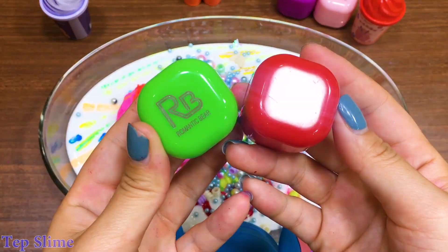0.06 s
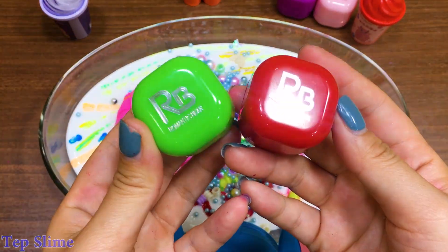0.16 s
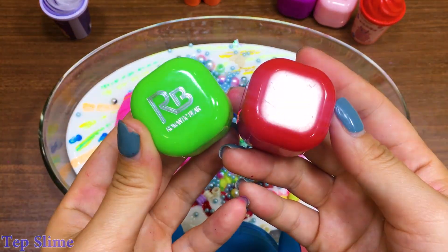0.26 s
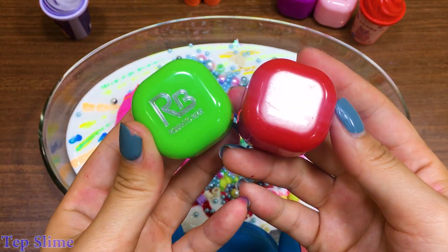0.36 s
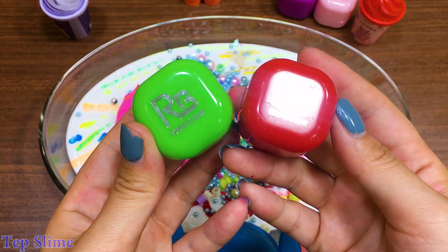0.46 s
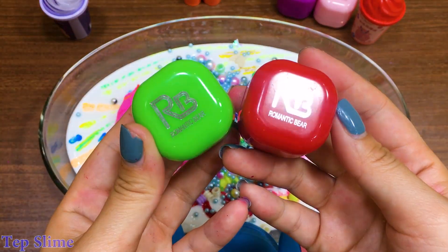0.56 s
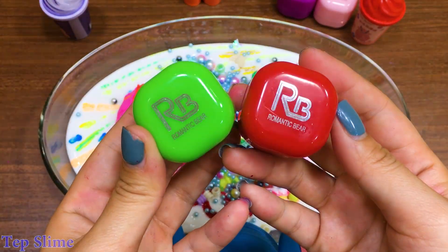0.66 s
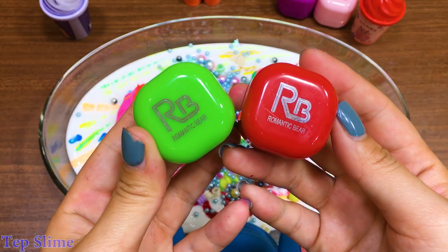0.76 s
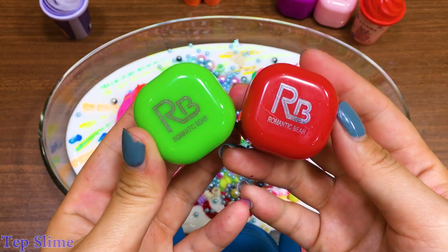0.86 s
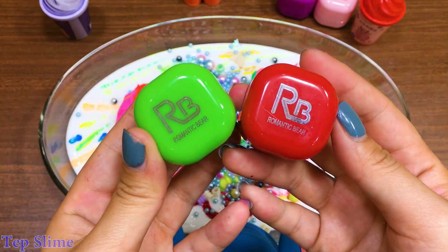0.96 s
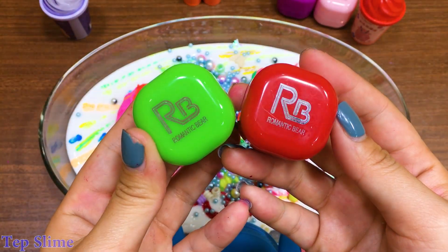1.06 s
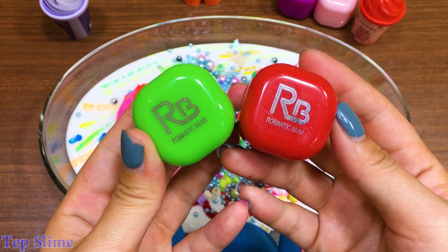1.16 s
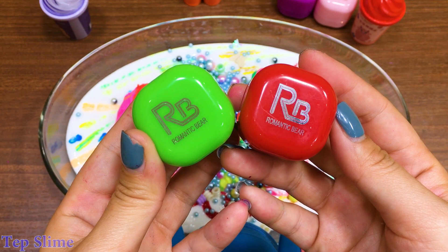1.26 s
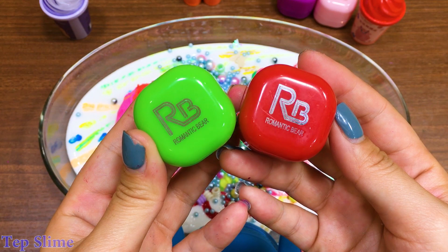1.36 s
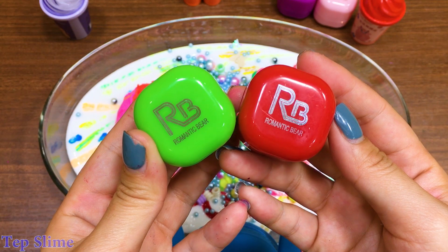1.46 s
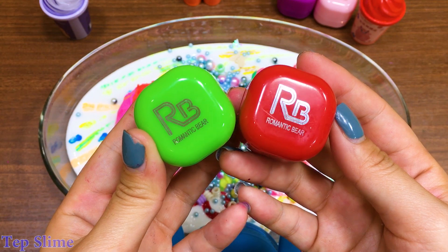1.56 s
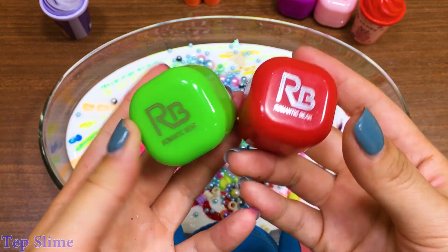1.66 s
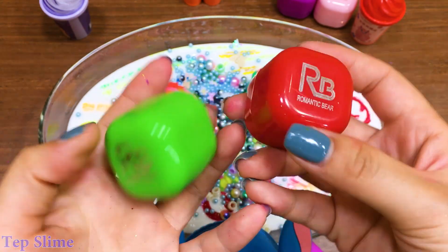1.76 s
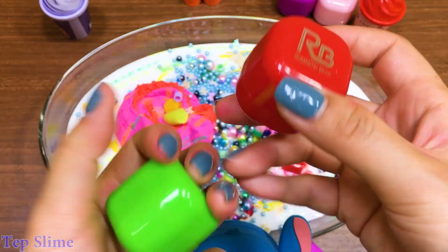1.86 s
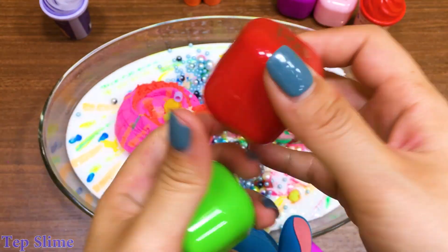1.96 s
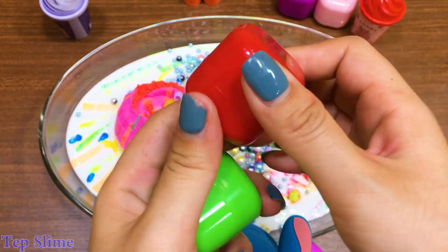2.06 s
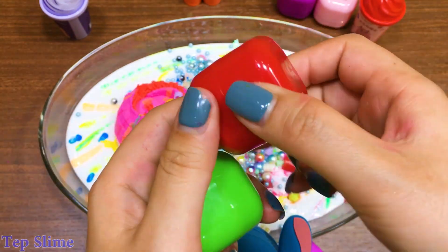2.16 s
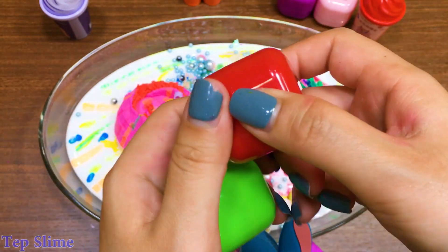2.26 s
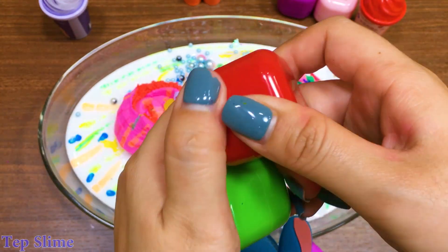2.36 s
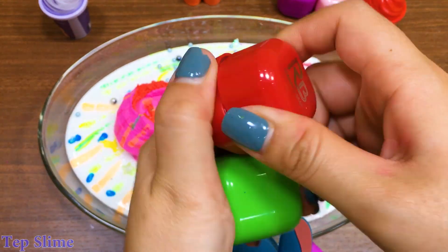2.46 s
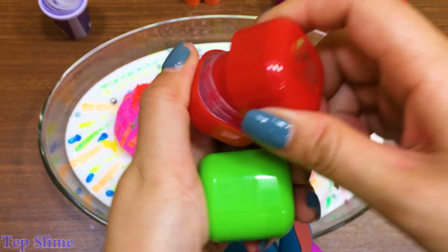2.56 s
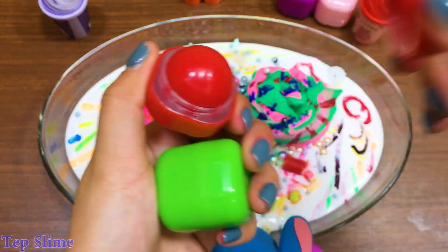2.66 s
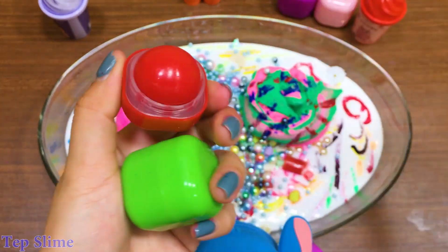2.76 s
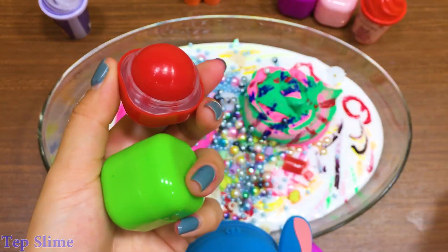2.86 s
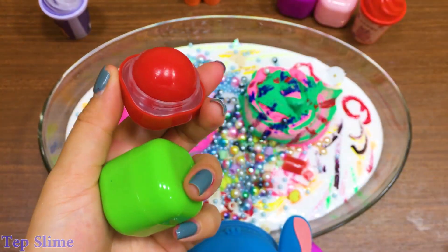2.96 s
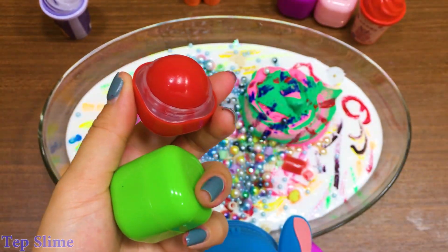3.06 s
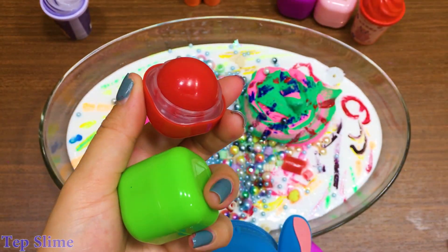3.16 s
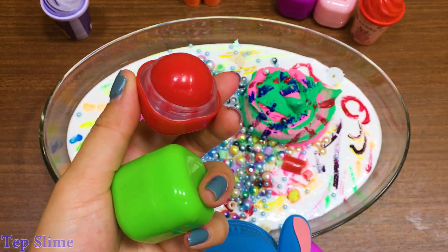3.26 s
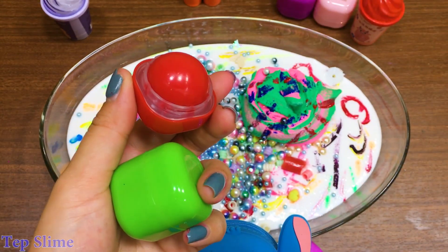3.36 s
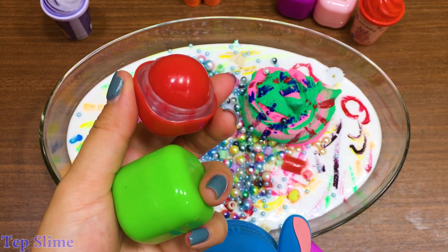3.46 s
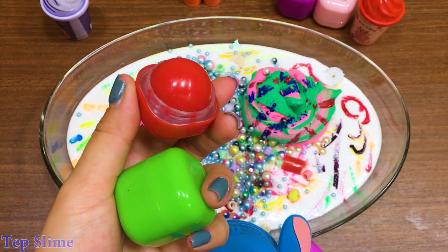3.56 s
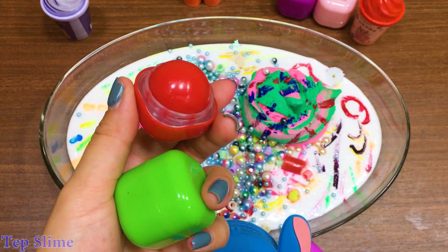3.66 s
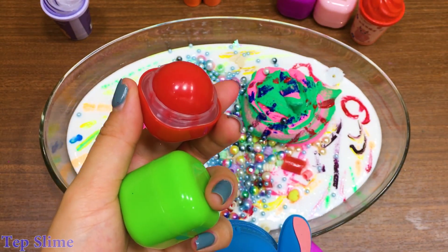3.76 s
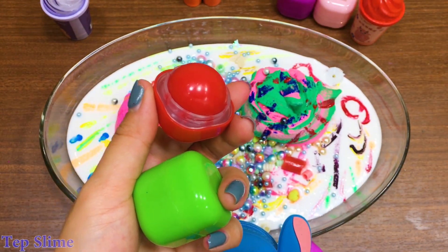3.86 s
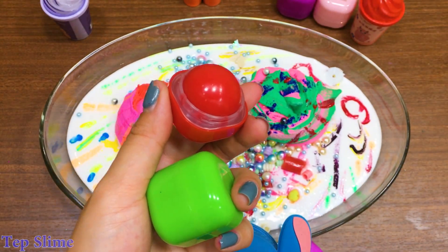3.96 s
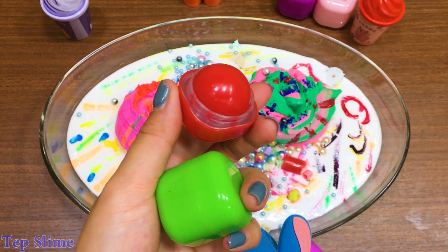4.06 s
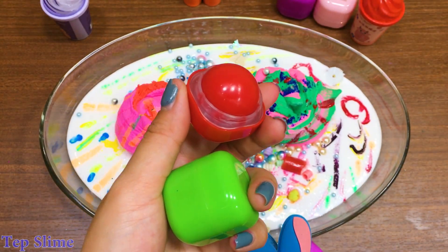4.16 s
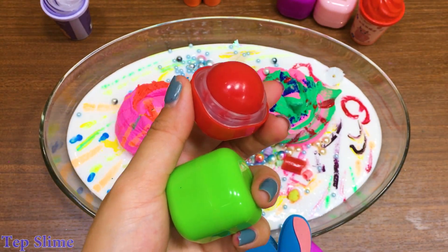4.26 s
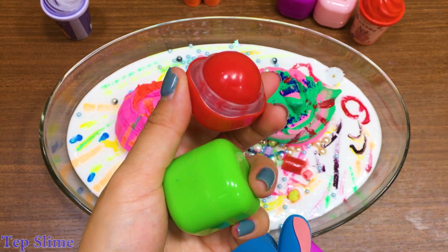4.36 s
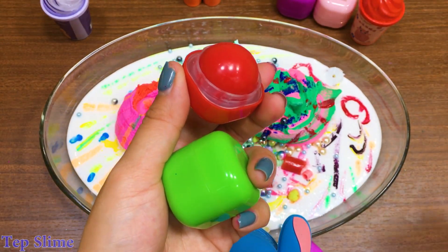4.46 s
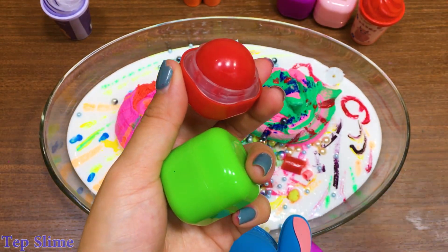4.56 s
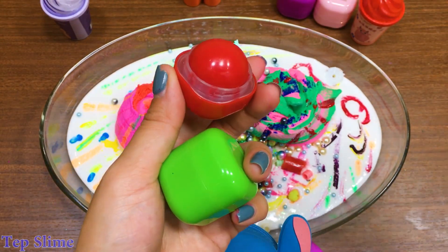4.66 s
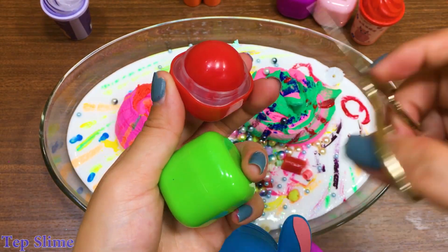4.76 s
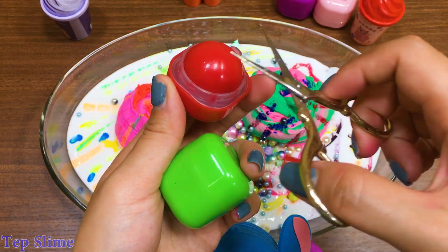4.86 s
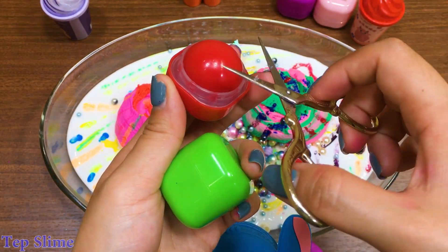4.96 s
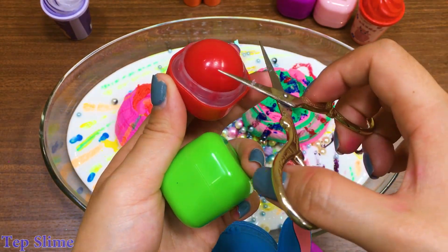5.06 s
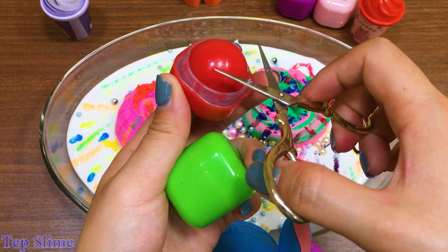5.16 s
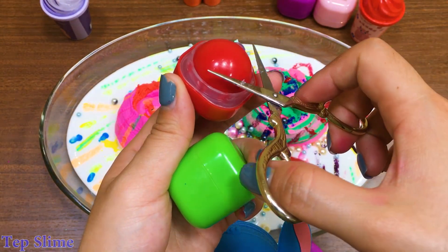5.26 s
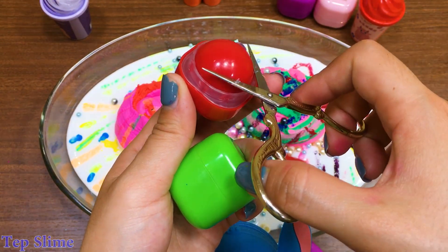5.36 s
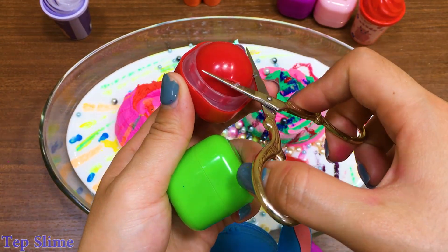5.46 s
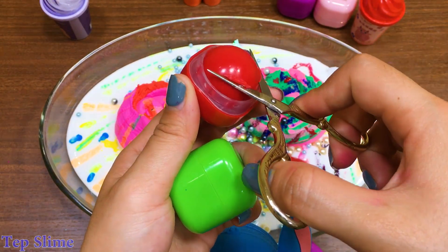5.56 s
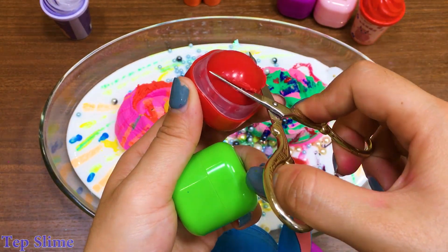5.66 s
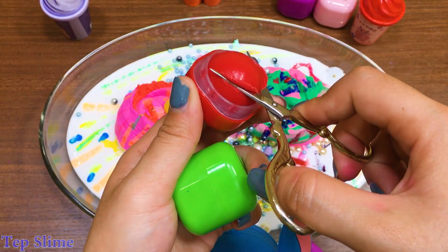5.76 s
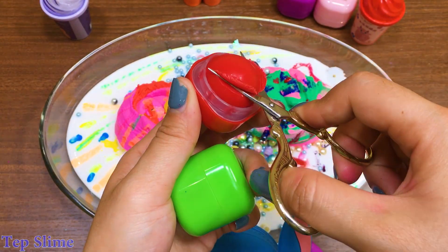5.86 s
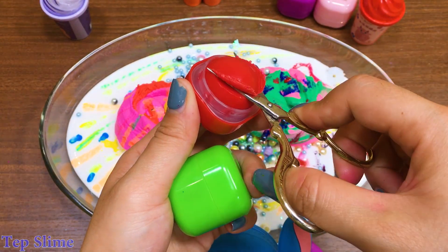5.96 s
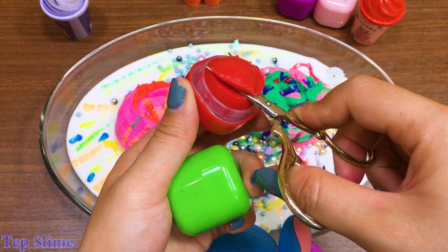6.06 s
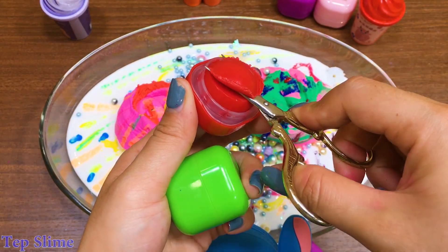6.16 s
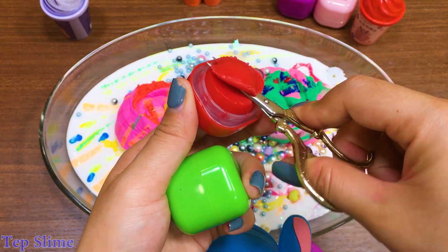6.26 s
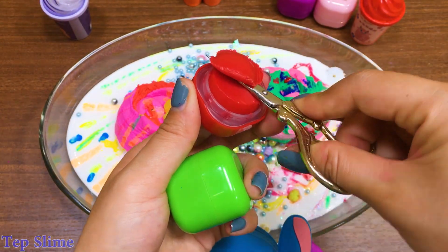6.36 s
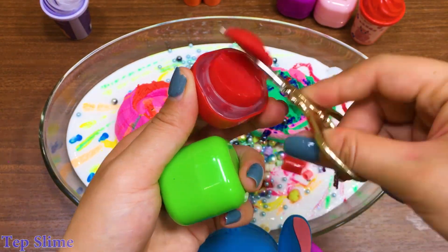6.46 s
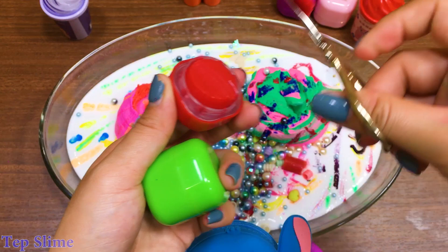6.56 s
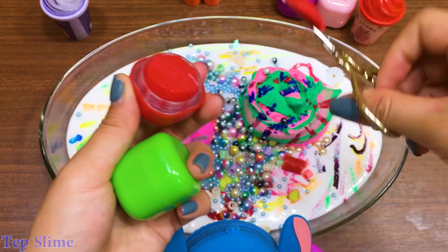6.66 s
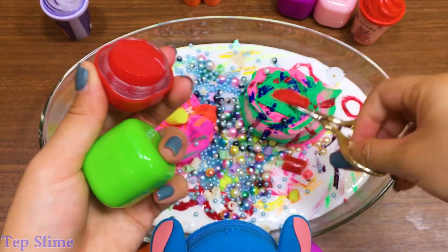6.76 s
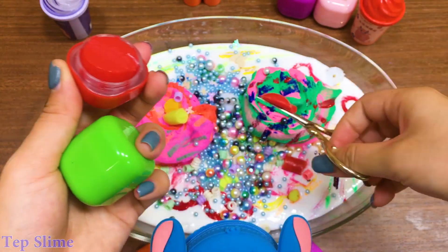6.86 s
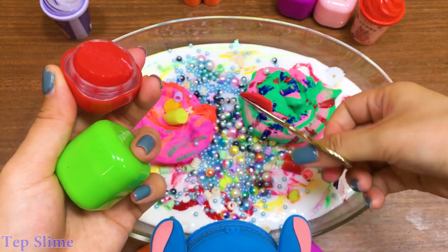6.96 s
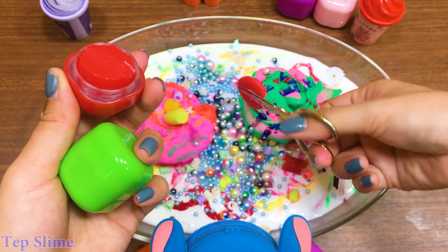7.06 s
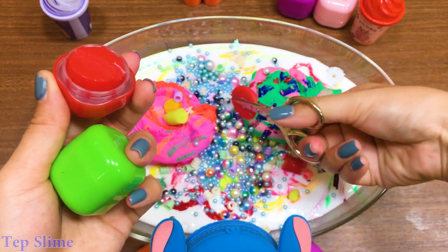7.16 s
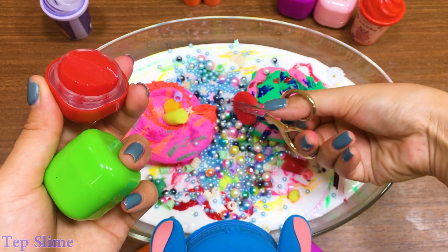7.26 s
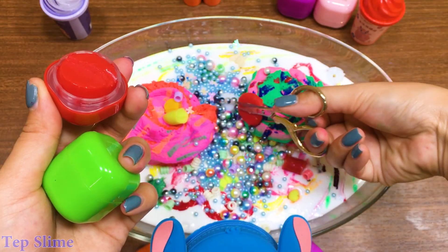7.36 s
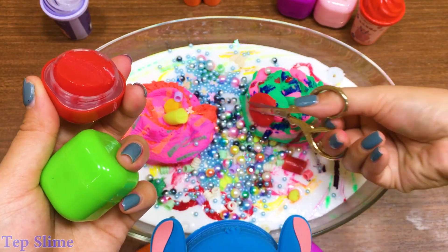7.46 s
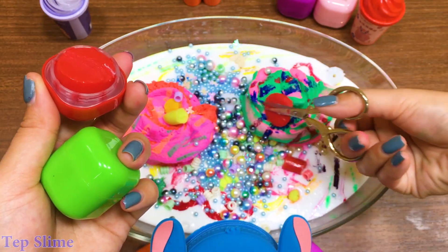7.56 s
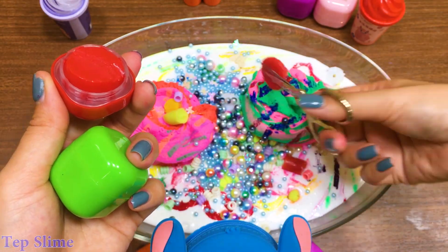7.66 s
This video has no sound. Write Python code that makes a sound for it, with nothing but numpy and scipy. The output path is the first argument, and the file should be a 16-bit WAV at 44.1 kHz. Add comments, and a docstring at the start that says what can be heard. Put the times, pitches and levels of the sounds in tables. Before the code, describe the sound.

Close plastic clicks and a sharp snap, a lid set down on wood, then steel scissors scraping, clinking and ticking in a quiet room.

```python
"""A quiet room, close to the microphone, with a low rumble and a faint hiss throughout.
Fingers rub a small plastic lip balm case; its lid clicks, creaks over the catch and snaps free.
The lid is set down on a wooden table, where it rocks on its rim and sets the top ringing.
Small steel scissors scrape across the wood and clink as they lift off; last, held by the
microphone, their blades tick together and knock at the pivot."""
import sys
import numpy as np
from scipy import signal
from scipy.fft import rfft, irfft, next_fast_len
from scipy.io import wavfile
from scipy.ndimage import map_coordinates

SR = 44100
rng = np.random.default_rng(int(sys.argv[2]) if len(sys.argv) > 2 else 0)


def wrap_up_sound(samples):
    """Save the sound to the file named by the first command line argument, as 16-bit audio."""
    columns = np.atleast_2d(samples).T
    # keep every value between -1 and 1, then stretch to whole-number steps
    tamed = np.clip(columns, -1, 1)
    steps = np.round(tamed * 32767).astype(np.int16)
    wavfile.write(sys.argv[1], SR, steps)


N = 339525

# Spectra of the room's rumble and the microphone's hiss: (frequency [Hz], relative level [dB])
RUMBLE_SPECTRUM = [(15, -46), (25, -19), (38, -7.5), (60, -1), (81, -3.5), (114, -3.5), (140, -7.5),
                   (220, -5.5), (297, -10.5), (330, -9), (372, -13.5), (445, -12), (565, -19), (730, -24),
                   (900, -27.5), (1170, -56), (1980, -120)]
HISS_SPECTRUM = [(410, -30.5), (700, -2.5), (863, -9), (971, -4.5), (1680, -8.5), (2370, -8), (2920, -10.5),
                 (4490, -9), (5400, -13.5), (6150, -10), (9730, -12), (11500, -15.5), (12600, -13),
                 (15000, -15.5), (16000, -20.5)]

# The snap's brief dying tail in the room, then the lid scraping off the case:
# (start [s], time to release [s], level at release [dB], release t60 [s])
SNAP_TAIL_AND_SCRAPE = [(2.740, .002, -50.5, .25), (2.818, .019, -45, 0.035)]

# Sliding strokes: (start [s], push [s], peak level [dB], release t60 [s])
FINGER_RUBS = [(2.03, 0.062, -64.5, 0.17), (2.14, .015, -66, .2), (2.19, 0.043, -64, .12),
               (2.4, 0.3, -68, 1.2)]  # skin on plastic
SCISSOR_DRAGS = [(3.856, 0.036, -55, 0.13), (4.166, 0.036, -44, 0.33), (4.228, 0.035, -41.5, 0.086),
                 (4.345, .012, -57.5, 0.071)]  # steel on wood
LIFT_SCUFFS = [(4.262, 0.029, -46.5, 0.22), (4.338, 0.023, -50, 0.13)]  # hollow scuffs as the scissors leave the table
STEEL_SQUEAKS = [(4.394, 0.031, -63.5, .05)]
BLADE_SHEARS = [(6.542, 0.038, -63, .25)]  # blade over blade at the pivot

# Contacts: (time [s], level [dB], tilt above 1 kHz [dB/octave], chatter t60 [s])
CASE_CLICKS = [(2.343, -47, 9.5, .003), (2.395, -52.5, -1, 0.0038), (2.5316, -23.5, -2.5, 0.012),
               (2.617, -43.5, 6, 0.0023), (2.6206, -40, -2, 0.0052), (2.7357, -10, 1.5, .005),
               (2.8044, -50, 7, .006), (2.8187, -35, -1, 0.019)]  # lid against case
EDGE_TICKS = [(3.0291, -49, -1, 0.0021), (3.2994, -45, 13, .008)]  # nail and rim on plastic
LID_KNOCKS = [(3.2996, -31, -10, 0.004), (3.3027, -22, 0, 0.013), (3.3140, -32, -4.5, 0.012)]  # lid landing flat on the table
LID_ROCKS = [(3.4050, -40.5, -5.5, 0.029), (3.4260, -40, 0.5, 0.025), (3.4392, -39, -2, 0.011)]  # lid rocking on its rim
SCISSOR_CATCHES = [(3.8815, -45.5, -3.5, .006), (3.8945, -48.5, -4, .005), (4.1675, -45, -1, 0.0062),
                   (4.2275, -38.5, 5, 0.0068), (4.2343, -34.5, -5, 0.0044), (4.2570, -34, -7.5, 0.0067)]  # steel catching on wood
HANDLE_CLINKS = [(4.2623, -25.5, -2, 0.021), (4.2638, -27.5, -5.5, 0.013)]
# Blades touching: (time [s], level [dB], tilt above 1 kHz [dB/octave], chatter t60 [s], pivot knock [dB])
BLADE_TICKS = [(4.8878, -54, -2, 0.0066, -69.5), (4.9370, -36.5, -0.5, 0.0098, -49.5),
               (6.5792, -66, -3, .004, -51), (6.5860, -60, 0, .004, -51), (6.6147, -33, -2, 0.0097, -38.5),
               (7.6522, -52.5, -4.5, .009, -75), (7.6690, -51, -0.5, .014, -71.5)]

# Spectra of the sounds, heard close up: (frequency [Hz], relative level [dB])
SKIN_SPECTRUM = [(800, -15.5), (2000, -2.5), (4000, 0.5), (6000, -4), (9000, -1.5), (11500, -7),
                 (14500, -3.5), (16000, -6.5)]
CASE_SPECTRUM = [(100, -25.5), (200, -14), (450, -17), (620, -24.5), (760, -8.5), (1100, -2.5), (1400, -6),
                 (2000, 1.5), (3900, -3.5), (4900, 0.5), (5900, -24), (8600, -11.5), (12300, -23),
                 (14500, -22)]
TAIL_AND_SCRAPE_SPECTRUM = [(59, -31.5), (100, -1.5), (206, 1.5), (1760, -14), (1910, -8), (3320, -8.5),
                            (3780, -13), (4290, -4.5), (5300, -12), (8640, -7), (10200, -17.5),
                            (14700, -15), (16000, -21)]
EDGE_SPECTRUM = [(500, -22), (2500, -17), (4200, -12), (5500, -14.5), (7500, 10), (9000, -8), (11500, -15),
                 (14000, -9), (16000, -12.5)]
LID_SPECTRUM = [(100, -35.5), (420, -6), (780, -9.5), (1200, -3), (1900, -1.5), (3300, -6.5), (3900, -5.5),
                (5300, -6), (6200, -36), (8000, -21), (8900, -14.5), (10500, -27), (16000, -33)]
SCRAPE_SPECTRUM = [(100, -19), (400, -10), (750, -7), (1000, -9), (1350, -6), (1650, -7), (2200, -1),
                   (2900, -3), (4200, -3), (5500, -12), (8000, -25), (16000, -37)]
SCUFF_SPECTRUM = [(200, -18), (850, -11), (1050, -2), (1230, -1.5), (1450, -6), (1680, -9), (2300, -22),
                  (3000, -25), (5500, -28), (8000, -35), (16000, -44)]
HANDLE_SPECTRUM = [(500, -24), (2000, -39), (5000, -13), (8500, -14), (10100, -2), (11200, -8), (13000, 4),
                   (16000, -21)]
SQUEAK_SPECTRUM = [(2000, -17), (4700, -8), (5300, -7), (5900, -21), (9300, -21), (9950, -3), (10600, -20),
                   (16000, -21)]
BLADE_SPECTRUM = [(300, -24), (1000, -22.5), (2400, -15.5), (3200, -6), (3950, -13), (4700, -3),
                  (5800, 0.5), (8500, -9.5), (10500, 4), (11600, 3), (13000, -2.5), (16000, -12)]
PIVOT_SPECTRUM = [(1000, -32), (3200, -20.5), (3600, -4), (4000, 2), (4250, -8), (4600, -20), (9000, -32),
                  (16000, -30)]

# Ringing modes of each object: (frequency [Hz], relative level [dB], t60 [s])
CASE_MODES = [(202, -22.5, 0.082), (438, -22, 0.031), (1057, -11.5, .014), (2030, -9.5, 0.0043),
              (2536, -3.5, 0.012), (2994, 1.5, 0.014), (3710, -5, 0.018), (4100, -7, 0.0061),
              (4381, 2.5, 0.0076), (4910, 4.5, 0.0088), (7100, -14, 0.013), (8600, -7.5, 0.012)]
LID_MODES = [(462, 0.5, 0.03), (1092, 11, 0.023), (1230, 5, 0.034), (1380, -9, 0.014), (1740, -3, 0.024),
             (4100, -11, .02), (8900, -13, .03)]
LID_RIM_MODES = [(1080, 7, 0.012), (3680, 0, 0.03), (4780, -1, 0.038), (8740, -18, .05)]
SCRAPE_MODES = [(1090, -4, .04), (1370, -4, 0.048), (2077, -6.5, 0.051), (2364, -6.5, 0.027),
                (3480, -4.5, .02), (4130, -9, 0.025)]  # scissors and wood together
HANDLE_MODES = [(7500, -3.5, 0.018), (10200, -7, 0.014), (12760, -1, 0.017), (12880, 0, 0.052),
                (13230, -5, 0.046), (14420, -8, .02), (15020, -6, .02)]
BLADE_MODES = [(3990, -6, 0.016), (7100, 1, 0.01), (8430, -11, 0.022), (10700, -17, .009),
               (12800, 9.5, 0.0089), (15000, 2, 0.016)]

# Response of the wooden top: (frequency [Hz], gain [dB])
TABLE_RESPONSE = [(100, -9), (400, -4), (800, -4), (1200, 0), (1600, -3), (2700, 0), (3100, -13),
                  (4200, -12), (7000, -28), (16000, -30)]
# Decay of the table top and of the room: (frequency [Hz], t60 [s])
TABLE_T60 = [(200, 0.72), (1200, 0.21), (3000, .16), (10000, 0.089)]
ROOM_T60 = [(200, .3), (2000, .24), (8000, .21), (15000, .16)]

# Narrow band of the room's hum: (frequency [Hz], relative level [dB])
HUM_SPECTRUM = [(40, -57.5), (51, -8), (56, -0.5), (61, -14.0), (80, -50), (300, -100)]


def amp(db):
    """Decibels to gain."""
    return 10 ** (np.asarray(db) / 20)


def unit_rms(x):
    """Scale to rms 1."""
    return x / np.sqrt(np.mean(x ** 2) + 1e-20)


def unit_energy(x):
    """Scale to a sum of squares of 1."""
    return x / (np.linalg.norm(x) + 1e-12)


def along(points, hz):
    """Read (frequency [Hz], value) points on a log frequency axis."""
    frequencies, values = np.transpose(points)
    return np.interp(np.log(hz + 1), np.log(frequencies + 1), values)


def colour(x, gain_db):
    """Causal (minimum-phase) filter whose gain is a function of frequency."""
    size = 2 * next_fast_len(len(x))
    gain = amp(gain_db(np.fft.rfftfreq(size, 1 / SR)))
    cepstrum = irfft(np.log(gain + 1e-6), size)
    cepstrum[1:size // 2] *= 2
    cepstrum[size // 2 + 1:] = 0
    return irfft(rfft(x, size) * np.exp(rfft(cepstrum)), size)[:len(x)]


def shaped(x, spectrum):
    """x coloured by a spectrum, at rms 1."""
    return unit_rms(colour(x, lambda hz: along(spectrum, hz)))


def reverberate(x, t60s):
    """Convolve with a dense tail in which each frequency dies at its own speed."""
    hz, t, noise = signal.stft(rng.standard_normal(SR // 2), SR, nperseg=256)
    decay = amp(-60 * t / along(t60s, hz)[:, None])
    tail = signal.istft(noise * decay, SR, nperseg=256)[1]
    return signal.fftconvolve(x, unit_energy(tail))[:N]


def room_tone(drift_db=1.16, knots_per_s=4):
    """The room's slowly drifting rumble and wavering hum, with the microphone's own hiss."""
    drift = map_coordinates(rng.standard_normal(N // 100), [np.arange(N) * knots_per_s / SR])
    rumble = amp(-65 + drift_db * drift) * shaped(rng.standard_normal(N), RUMBLE_SPECTRUM)
    hum = amp(-81) * shaped(rng.standard_normal(N), HUM_SPECTRUM)
    hiss = amp(-71.5) * shaped(rng.standard_normal(N), HISS_SPECTRUM)
    return rumble + hum + hiss


def strokes(rows, swell_db, grip_s=.004):
    """Gain over time: each stroke sets in, changes by swell_db over its push, then dies away."""
    t, power = np.arange(N) / SR, np.zeros(N)
    for start, push_s, db, t60 in rows:
        grip = np.clip((t - start) / grip_s + 1, 0, 1)
        pushed = np.clip((t - start) / push_s, 0, 1)
        release = np.exp(-np.log(1000) * np.maximum(t - start - push_s, 0) / t60)
        power += (grip * amp(db + swell_db * (pushed - 1)) * release) ** 2
    return np.sqrt(power)


def friction(spectrum, slips_per_s, smooth_db):
    """Tiny slips of random size over a smooth rub, at rms 1."""
    slips = (rng.random(N) < slips_per_s / SR) * rng.standard_normal(N)
    return shaped(unit_rms(slips) + amp(smooth_db) * rng.standard_normal(N), spectrum)


def finger_rubs():
    """Skin slips faintly on the plastic as the fingers turn the case."""
    return strokes(FINGER_RUBS, swell_db=6.5) * friction(SKIN_SPECTRUM, slips_per_s=700, smooth_db=-3)


def fade(t60):
    """A tenth of a second of exponential decay."""
    return np.exp(-np.log(1000) * np.arange(SR // 10) / SR / max(t60, 1e-4))


def ringing(modes):
    """An object's free ring, of energy 1; the grip shifts each mode's strength and pitch a little."""
    t = np.arange(SR // 10) / SR
    ring = np.zeros(len(t))
    for k, (hz, db, t60) in enumerate(modes):
        strength = (-1) ** k * amp(db + rng.normal(0, 1.5))
        pitch_hz = hz * rng.normal(1, .004)
        ring += strength * fade(t60) * np.sin(2 * np.pi * pitch_hz * t)
    return unit_energy(ring)


def contacts(rows, spectrum, modes, chatter_db, ring_db):
    """Each contact is a sharp push with a brief chatter, and rings the object's modes."""
    out = np.zeros(N + SR)
    for start, db, tilt_db, chatter_s in rows:
        force = amp(chatter_db) * unit_energy(rng.standard_normal(SR // 10) * fade(chatter_s))
        force[0] += 1
        impact = unit_energy(colour(force, lambda hz: along(spectrum, hz)))
        hit = impact + amp(ring_db) * ringing(modes)
        # harder, smaller contacts are brighter
        hit = colour(hit, lambda hz: tilt_db * np.log2(np.maximum(hz, 1000) / 1000))
        # the level is that of the hit's energy packed into one millisecond
        out[round(start * SR):][:len(hit)] += amp(db) * np.sqrt(SR / 1000) * unit_energy(hit)
    return out[:N]


def click_touches(give_s=.002, give_db=-28, rebound_share=.34, rebound_db=-11.5):
    """Contact rows of the case's clicks: the plastic gives, strikes home and rebounds once."""
    touches = []
    for start, db, tilt_db, chatter_s in CASE_CLICKS:
        for delay_s, gain_db in [(-give_s, give_db), (0, 0), (rebound_share * chatter_s, rebound_db)]:
            touches.append((start + delay_s, db + gain_db, tilt_db, chatter_s))
    return touches


def creak_slips(count=7, start_s=2.6715, first_gap_s=.0026, slowing=1.45):
    """Contact rows of a stick-slip creak: the lid sticks longer each time and slips harder, up to a cap."""
    full_db, full_stick_s, db_per_doubling = -42, .007, 8.5
    tilt_db, chatter_s = .5, .003
    gaps = first_gap_s * slowing ** np.arange(count)
    times = start_s + np.cumsum(gaps) - gaps
    load = np.minimum(gaps / slowing / full_stick_s, 1)
    levels = full_db + db_per_doubling * np.log2(load)
    return [(time, db, tilt_db, chatter_s) for time, db in zip(times, levels)]


def case_opening():
    """The lid clicks, creaks, snaps with a brief tail in the room, then scrapes off; hard edges tick."""
    clicks = contacts(click_touches() + creak_slips(), CASE_SPECTRUM, CASE_MODES, chatter_db=-5, ring_db=-4)
    ticks = contacts(EDGE_TICKS, EDGE_SPECTRUM, CASE_MODES, chatter_db=0, ring_db=-16)
    dense_noise = friction(TAIL_AND_SCRAPE_SPECTRUM, slips_per_s=4400, smooth_db=-1)
    tail_and_scrape = strokes(SNAP_TAIL_AND_SCRAPE, swell_db=-3) * dense_noise
    return clicks + ticks + tail_and_scrape


def lid_landing():
    """The lid knocks flat on the table, then rocks on its rim."""
    knocks = contacts(LID_KNOCKS, LID_SPECTRUM, LID_MODES, chatter_db=3.5, ring_db=-13.5)
    rocks = contacts(LID_ROCKS, LID_SPECTRUM, LID_RIM_MODES, chatter_db=5, ring_db=1)
    return knocks + rocks


def table_ring(drive):
    """The wooden top rings on under knocks and scrapes, longest in the bass."""
    return colour(reverberate(amp(-6) * drive, TABLE_T60), lambda hz: along(TABLE_RESPONSE, hz))


def scissor_drag():
    """Steel slides and catches on wood: a slow slide mostly rings both, a faster one turns to a rasp."""
    speed = strokes(SCISSOR_DRAGS, swell_db=6)
    slow_rub = friction(SCRAPE_SPECTRUM, slips_per_s=1200, smooth_db=-2)
    ring = unit_rms(signal.fftconvolve(slow_rub, ringing(SCRAPE_MODES))[:N])
    rasp = friction(SCRAPE_SPECTRUM, slips_per_s=3000, smooth_db=-8.5)
    rasp_share = np.clip(speed / speed.max(), 0, 1) ** 0.54
    slide = speed * (np.sqrt(rasp_share) * rasp + np.sqrt(1 - rasp_share) * ring)
    return slide + contacts(SCISSOR_CATCHES, SCRAPE_SPECTRUM, SCRAPE_MODES, chatter_db=4, ring_db=-15)


def lift_scuffs():
    """The scissors brush the wood with a hollow sound as they leave the table."""
    return strokes(LIFT_SCUFFS, swell_db=16) * friction(SCUFF_SPECTRUM, slips_per_s=1200, smooth_db=5)


def scissors_in_hand(pivot_lag_s=.00108, pivot_tilt_db=-5.5, pivot_chatter_s=.0048):
    """Steel parts touch and rub; the hand damps their ring quickly."""
    handles = contacts(HANDLE_CLINKS, HANDLE_SPECTRUM, HANDLE_MODES, chatter_db=7, ring_db=-2.5)
    touches = [row[:-1] for row in BLADE_TICKS]
    ticks = contacts(touches, BLADE_SPECTRUM, BLADE_MODES, chatter_db=-2.5, ring_db=-.5)
    # the pivot knocks in its play just after each touch of the blades
    play = [(time + pivot_lag_s, db, pivot_tilt_db, pivot_chatter_s) for time, *_, db in BLADE_TICKS]
    knocks = contacts(play, PIVOT_SPECTRUM, BLADE_MODES, chatter_db=-3, ring_db=-32)
    shear = strokes(BLADE_SHEARS, swell_db=13) * friction(PIVOT_SPECTRUM, slips_per_s=510, smooth_db=-4)
    squeak = strokes(STEEL_SQUEAKS, swell_db=3) * friction(SQUEAK_SPECTRUM, slips_per_s=560, smooth_db=0)
    return handles + ticks + knocks + shear + squeak


def scene():
    """All is close, so the room answers faintly, and least to the scissors held by the microphone."""
    plastic = case_opening() + finger_rubs()
    on_table = lid_landing() + scissor_drag()
    wood = on_table + lift_scuffs() + table_ring(on_table)
    steel = scissors_in_hand()
    room = reverberate(amp(-21) * plastic + amp(-19) * wood + amp(-25) * steel, ROOM_T60)
    return (plastic + wood + steel + room + room_tone())[None]


def record(dry):
    """The recorder drops the deepest bass and keeps nothing above its band limit."""
    low_cut_hz, top_hz = 38, 16300
    low_cut = signal.butter(3, low_cut_hz, "high", fs=SR, output="sos")
    band_limit = signal.ellip(12, .1, 90, top_hz, fs=SR, output="sos")
    return signal.sosfilt(band_limit, signal.sosfilt(low_cut, dry))


dry = scene()
out = record(dry)
wrap_up_sound(out)
```